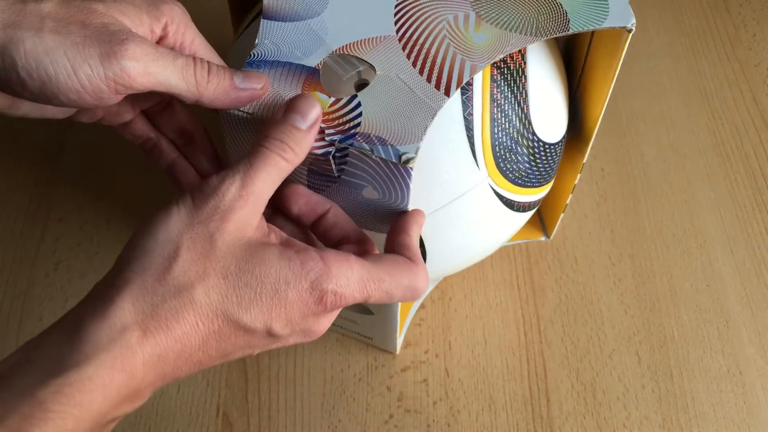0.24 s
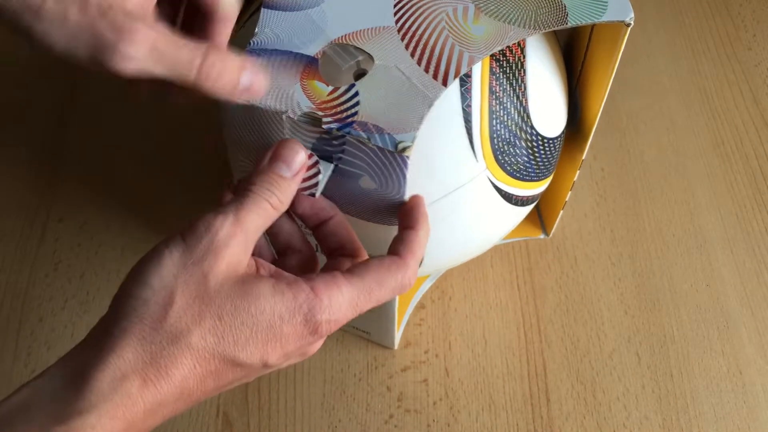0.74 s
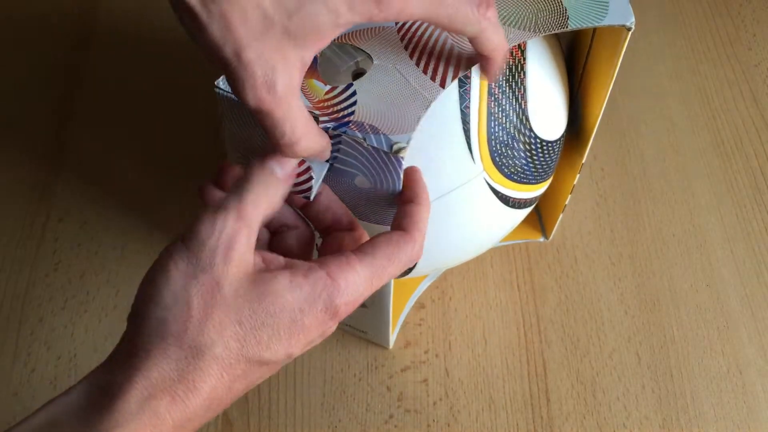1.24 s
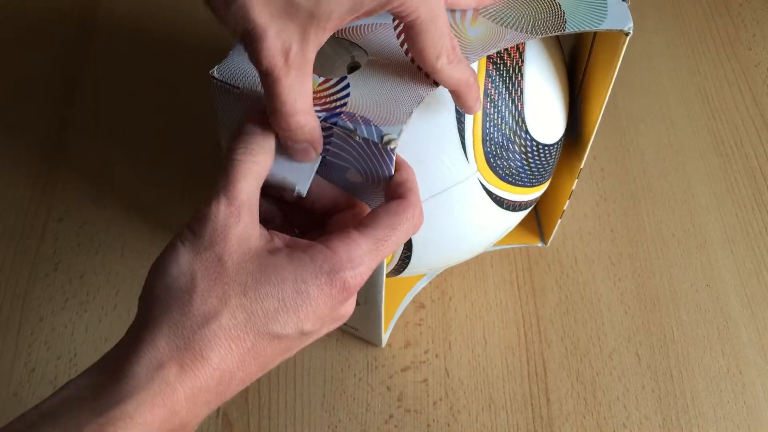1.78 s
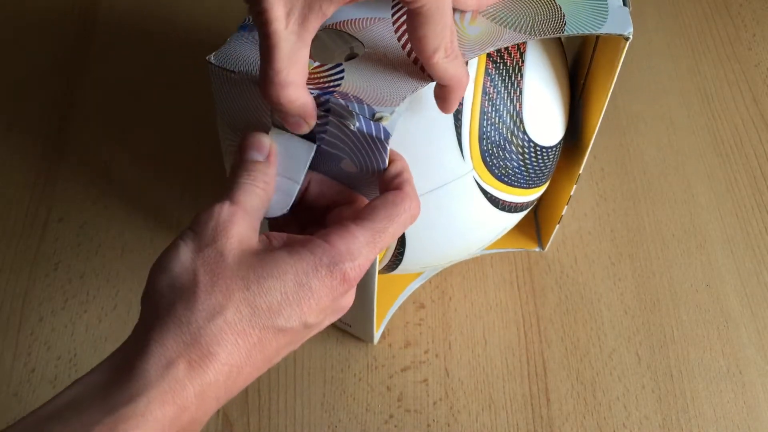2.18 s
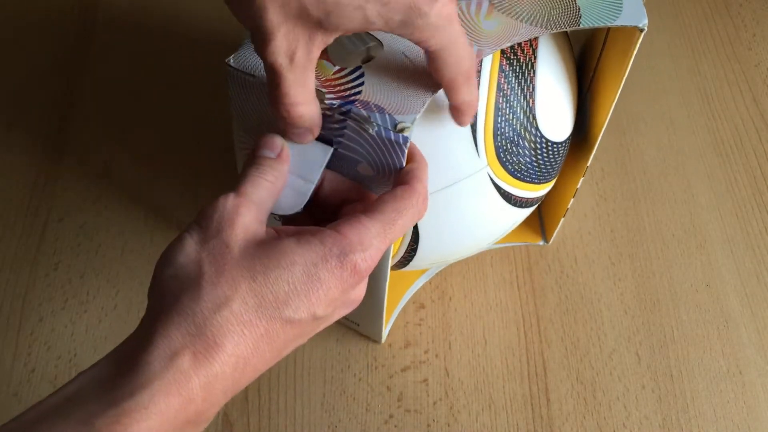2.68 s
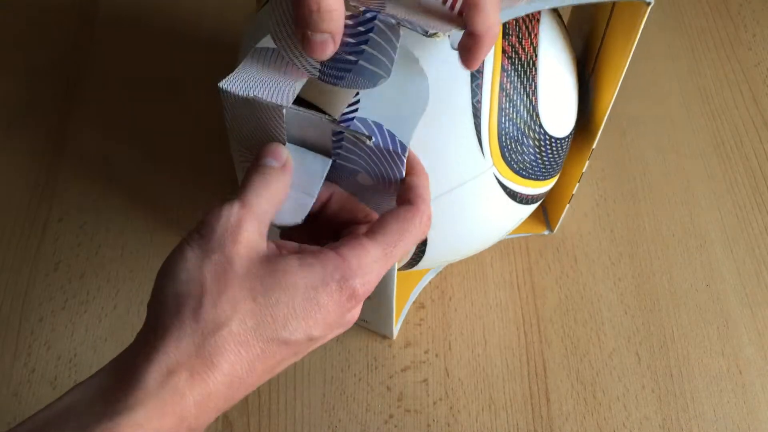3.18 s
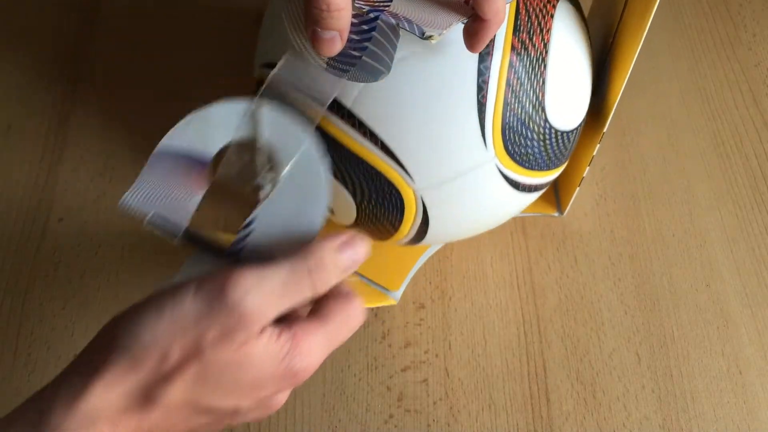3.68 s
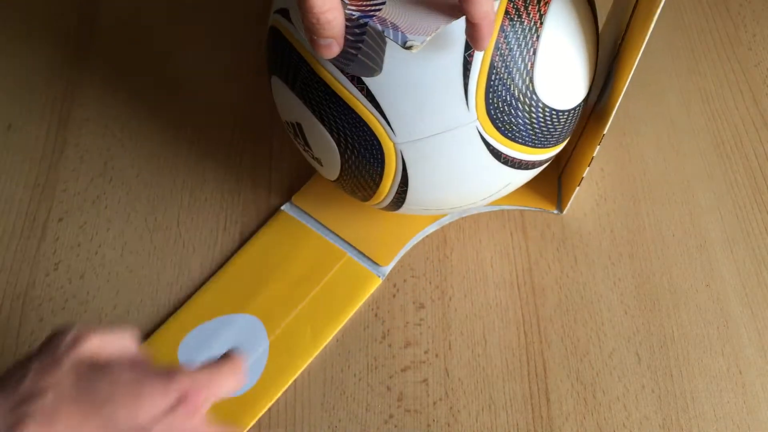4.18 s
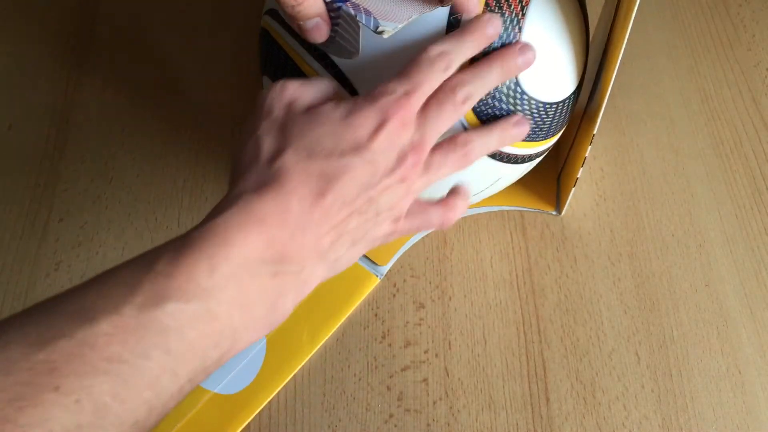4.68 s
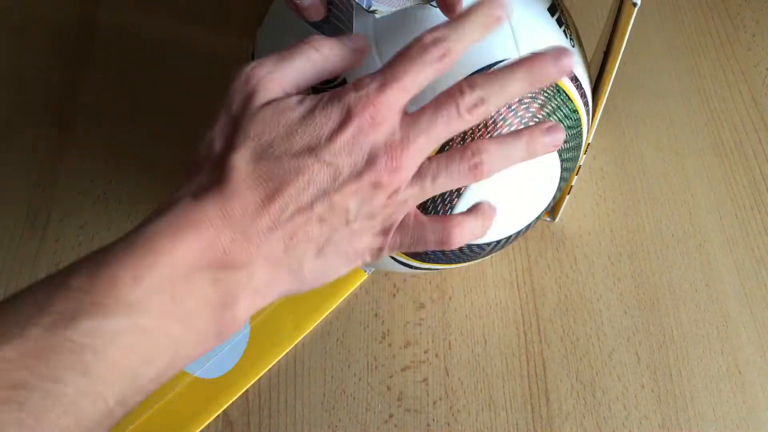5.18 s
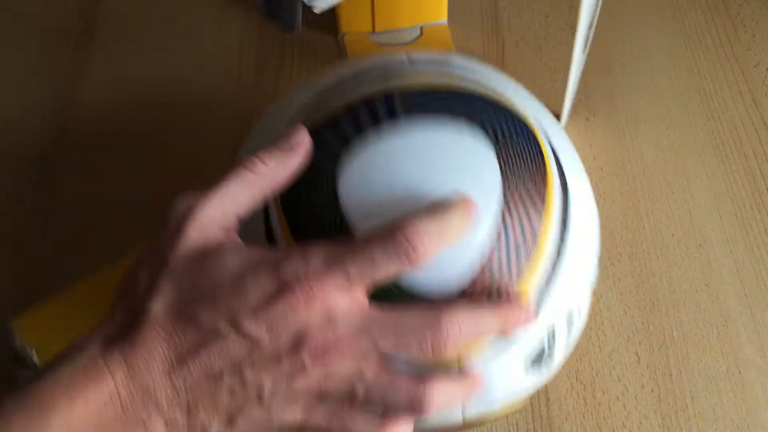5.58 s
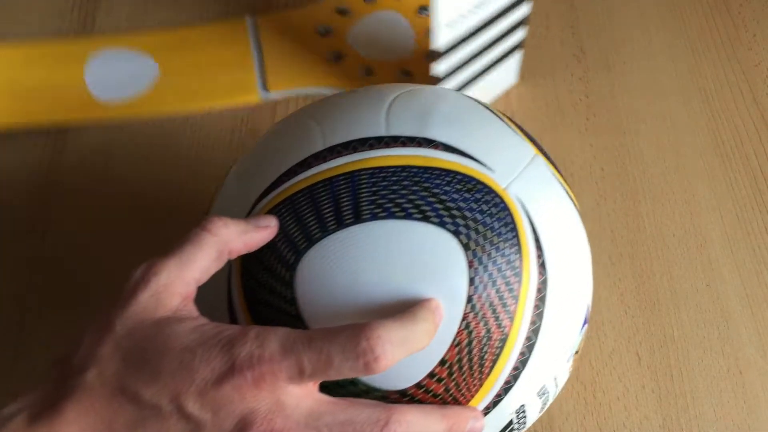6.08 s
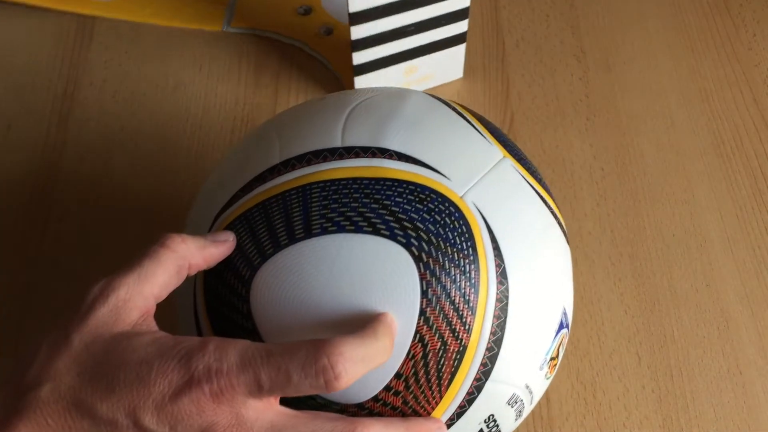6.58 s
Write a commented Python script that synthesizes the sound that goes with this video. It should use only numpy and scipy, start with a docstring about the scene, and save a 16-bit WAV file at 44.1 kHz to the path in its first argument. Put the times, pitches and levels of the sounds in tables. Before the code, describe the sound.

Crisp card snaps, a quick tearing peel and a clattering flap, then soft ball thumps and an empty box scraping over a wooden table.

```python
"""Creases snap and a tab drags out of its slot as hands open a football's cardboard box on a wooden table.
A paper band peels off, fingers rub, and the loose card drops and bounces in the small room.
The ball rolls out with soft thumps, then the empty box is pushed away over the wood.
Drags, rubs and snaps are fibre slips through panel resonances; drops and bumps are decaying modes.
Faint air, a low hum and a short tail from the near walls surround them at a small microphone."""
import sys
import numpy as np
from scipy import signal
from scipy.fft import rfft, irfft, next_fast_len
from scipy.io import wavfile
from scipy.ndimage import uniform_filter1d

SR = 44100
rng = np.random.default_rng(int(sys.argv[2]) if len(sys.argv) > 2 else 0)


def waveform_to_disk(signal):
    """Save audio, clipped to [-1, 1], as 16-bit WAV at the path in sys.argv[1]."""
    frames = np.transpose(np.atleast_2d(signal))
    scaled = np.clip(frames, -1, 1) * 32767
    samples = np.round(scaled).astype(np.int16)
    wavfile.write(sys.argv[1], SR, samples)


N = 301644
T = np.arange(N) / SR

# colour of rubbed card and of the rubbed box: hz, level_db
CARD_COLOUR = [(150, -2), (400, -14), (620, -4), (900, -2.5), (1800, 10), (2700, -4.5), (4000, -7.5),
               (8500, -7.5), (11500, -11.5), (15500, -14.5)]
BOX_COLOUR = [(150, 3), (400, -3), (700, -8.5), (1100, -3.5), (1500, -3), (2300, 2.5), (4200, -12.5),
              (6000, -10.5), (9500, -15), (11000, -20), (15500, -21)]
# resonances standing over the card's colour: centre_hz, width_hz, lift_db
CARD_RESONANCES = [(396, 160, 15.5), (1262, 200, 6), (1740, 390, -10.5), (3390, 310, 6.5), (4320, 180, 4.5),
                   (9000, 1200, 2.5)]


def undb(db):
    """Decibels to gain."""
    return 10 ** (np.asarray(db) / 20)


def unit(x):
    """Scale to rms 1."""
    return x / np.sqrt(np.mean(x ** 2) + 1e-30)


def add(out, s, x):
    """Mix x into out from time s."""
    i = int(np.clip(s * SR, 0, N - 1))
    out[i:i + len(x)] += x[:N - i]


def walk(size, rate):
    """Smooth random drift with spread near 1, turning at most rate times a second."""
    step = SR / rate
    knots = rng.standard_normal(size // 20 + 4)
    return np.interp(np.arange(size) / step, np.arange(len(knots)), knots) * np.sqrt(3 / 2)


def strokes(rows, attack_s, release_s):
    """Level in dB of held strokes that rise and fall by 20 dB per attack and release time."""
    levels = []
    for start, end, db in rows:
        outside = np.maximum((start - T) / attack_s, (T - end) / release_s)
        levels.append(db - 20 * np.maximum(0, outside))
    return np.max(levels, axis=0)


def follow(curve):
    """Level in dB along a curve, silent outside it."""
    return np.interp(T, *np.transpose(curve), left=-np.inf, right=-np.inf)


def response(colour, peaks=(), size=2048):
    """Causal impulse response of a surface: its broad colour with panel resonances on top."""
    f = np.arange(size // 2 + 1) * SR / size
    hz, db = np.transpose(colour)
    gain_db = np.interp(np.log(f + 1), np.log(hz), db)
    gain_db = gain_db - 20 * np.log10(1 + (hz[0] / (f + 1)) ** 2)  # bass roll-off
    for centre, width, lift in peaks:
        gain_db = gain_db + lift / (1 + (2 * (f - centre) / width) ** 2)
    # folding the cepstrum gives minimum phase: the energy comes as early as it can
    cepstrum = irfft(gain_db * np.log(10) / 20)
    cepstrum[1:size // 2] *= 2
    cepstrum[size // 2 + 1:] = 0
    return irfft(np.exp(rfft(cepstrum)))


def bass_of(db):
    """Bass in dB over the middle: it grows more slowly than the rest as a contact gets stronger."""
    return -13 - 0.19 * (db + 51)


def radiate(force, ring, db, treble_db, bass_db):
    """A force sounds a panel: sharp contact brings out treble, a firmly coupled box brings out bass."""
    size = next_fast_len(len(force) + len(ring))
    f = np.fft.rfftfreq(size, 1 / SR)
    sound = rfft(force, size) * rfft(ring, size)
    low = 1 / (1 + (f / 700) ** 8)
    high = 1 - 1 / (1 + (f / 3000) ** 12)
    out = 0
    for mask, lift_db in ((1 - low - high, 0), (high, treble_db), (low, bass_db)):
        band = irfft(sound * mask, size)[:len(force)]
        out = out + unit(band) * undb(db + lift_db)
    return out * np.std(force)


def fibres(size, rate, spread_db):
    """Paper fibres catch and let go: random slips per second, uneven in strength, over a soft hiss."""
    slips = rng.random(size) < rate / SR
    strength = undb(spread_db * np.minimum(rng.exponential(size=size), 4))
    direction = rng.choice([-1, 1], size)
    return unit(slips * strength * direction + 0.18 * rng.standard_normal(size))


def scrape(level_db, ring, rate, spread_db, grip_db, gain_db, treble_db, brighten, bass_db, patchy_db,
           size=512):
    """In a drag fibres stick and slip under uneven pressure; brighten is treble dB per dB of level."""
    moving = level_db > -90
    slips = fibres(N, rate, spread_db) * undb(grip_db * walk(N, rate=140))
    # the contact point travels, so it drives ever different narrow resonances of the panel
    bands = signal.stft(slips, nperseg=size)[2]
    patches = uniform_filter1d(rng.standard_normal(bands.shape), size=3, axis=0)
    patches = unit(uniform_filter1d(patches, size=8, axis=1))
    force = signal.istft(bands * undb(patchy_db * patches), nperseg=size)[1][:N][moving]
    db = level_db[moving]
    treble = treble_db + brighten * (db - db.max())
    out = np.zeros(N)
    out[moving] = radiate(unit(force), ring, db + gain_db, treble, bass_of(db) + bass_db)
    return out


def strike(modes, weights, detune, size=12000):
    """Decaying modes after one blow, peak 1; neighbouring modes swing opposite ways."""
    t = np.arange(size) / SR
    hz, db, t60 = np.transpose(modes)[:, :, None]
    hz = hz * (1 + detune * rng.standard_normal(hz.shape))
    swings = undb(db - 60 * t / t60) * np.sin(2 * np.pi * hz * t)
    signs = (-1) ** np.arange(len(modes))
    ring = (weights * signs) @ swings
    return ring / np.abs(ring).max()


def background(air_db=-70, hum_db=-74.5, hum_hz=120.8, waver_db=0.5):
    """The still room: faint steady air as coloured noise, and a low hum wavering in phase and level."""
    # colour of the air: hz, level_db (per Hz, relative)
    air_colour = [(25, -2), (60, 1), (130, 2.5), (300, -6.5), (600, -12), (2000, -14.5), (8000, -21.5),
                  (15000, -25)]
    noise = rng.standard_normal(N + 8191)
    air = signal.fftconvolve(noise, response(air_colour, size=8192), "valid")
    hum = np.sin(2 * np.pi * hum_hz * T + 0.4 * walk(N, rate=4.7))
    hum = hum * undb(waver_db * walk(N, rate=10))
    return undb(air_db) * unit(air) + undb(hum_db) * unit(hum)


def room(x, wet_db=-13, t60=0.18, dull_hz=6000, gap_s=0.005, size=16000):
    """The short, slightly dull tail that the near walls send back."""
    t = np.arange(size) / SR
    tail = fibres(size, rate=4000, spread_db=0.5)  # random slips serve as dense echoes
    tail = tail * undb(-60 * t / t60) * (t > gap_s)
    tail = signal.lfilter(*signal.butter(1, dull_hz, fs=SR), tail)
    return undb(wet_db) * signal.fftconvolve(x, tail / np.linalg.norm(tail))[:N]


def grip_shifts():
    """Hands shift their grip on the card: sparse, faint fibre slips."""
    # shifts: start_s, end_s, level_db (before gain)
    shifts = [(0.24, 0.34, -79.5), (2.1, 2.22, -72), (2.54, 2.76, -75.5), (3.3, 3.48, -74)]
    return scrape(strokes(shifts, attack_s=0.058, release_s=0.045), response(CARD_COLOUR, CARD_RESONANCES),
                  rate=260, spread_db=1.5, grip_db=4.5, gain_db=0.5,
                  treble_db=-2.5, brighten=-0.13, bass_db=3.5, patchy_db=5)


def palm():
    """Dry skin hisses over the smooth ball: dense slips through the skin's colour."""
    # brushes of the palm: start_s, end_s, level_db
    brushes = [(5.01, 5.075, -60.5), (5.39, 5.49, -57)]
    # colour of skin on the ball: hz, level_db
    skin_colour = [(200, 6.5), (1500, -14), (7000, -6), (15500, -0.5)]
    hiss = signal.fftconvolve(fibres(N, rate=10000, spread_db=4), response(skin_colour))[:N]
    return unit(hiss) * undb(strokes(brushes, attack_s=0.083, release_s=0.086))


def rubs(gain_db=-2.0, grip_db=3, bass_db=0.2, size=16000):
    """Short strokes of fingers and card on card swell and stop, with an uneven grip."""
    # strokes: start_s, end_s, level_db (before gain), treble_db (over the middle)
    rub_strokes = [(0.712, 0.789, -64, -1), (0.775, 0.795, -61.5, 8), (1.193, 1.235, -64, -4),
                   (1.233, 1.279, -56.5, 1), (1.319, 1.358, -66, -5), (1.683, 1.764, -66, -2),
                   (1.822, 1.86, -63.5, -1), (1.858, 1.95, -51.5, -0.5), (2.284, 2.308, -63.5, 3),
                   (2.437, 2.479, -64.5, -3.5), (2.628, 2.676, -64.5, 2.5), (3.497, 3.544, -59, 1),
                   (3.595, 3.714, -66.5, 9.5), (3.875, 3.998, -69.5, 2), (4.058, 4.12, -70, 2.5)]
    ring = response(CARD_COLOUR, CARD_RESONANCES)
    out = np.zeros(N)
    for start, end, db, treble_db in rub_strokes:
        count = int(np.clip((end - start) * SR, SR / 200, size - len(ring)))
        slips = fibres(size, rate=2700, spread_db=3.0) * undb(grip_db * walk(size, rate=149))
        force = unit(slips[:count] * signal.windows.tukey(count, 0.6))
        force = np.pad(force, (0, len(ring)))  # space for the panel to ring on
        add(out, start, radiate(force, ring, db + gain_db, treble_db, bass_of(db) + bass_db))
    return out


def ball_rubs():
    """The ball rubs in its seat, then rolls out: fibre slips sound the box."""
    # rubs: start_s, end_s, level_db (before gain)
    seat_rubs = [(4.62, 5.1, -76.5), (4.9, 4.915, -52.5), (5.5, 5.62, -50.5), (5.64, 5.81, -49)]
    # resonances over the box's colour: centre_hz, width_hz, lift_db
    box_resonances = [(405, 38, 9.3), (1010, 71, 4.1), (2056, 340, 13.7), (2630, 50, 1.3), (3450, 110, 3.5),
                      (8600, 1000, 1.8)]
    return scrape(strokes(seat_rubs, attack_s=0.085, release_s=0.058), response(BOX_COLOUR, box_resonances),
                  rate=4000, spread_db=3, grip_db=2.0, gain_db=-1.5,
                  treble_db=-5.5, brighten=-0.11, bass_db=-5.5, patchy_db=2.5)


def bumps(octaves=0.49):
    """Ball and hands bump the box: soft contacts wake its low modes, hard ones the high."""
    # contacts: s, peak_db, driven_hz (where the contact drives most)
    contacts = [(1.107, -32.5, 3320), (1.420, -28, 1010), (2.314, -51, 453), (2.333, -57.5, 437),
                (2.636, -51.5, 228), (3.061, -41.5, 270), (3.112, -45, 705), (3.627, -45, 438),
                (4.188, -41.5, 297), (5.292, -40, 1440), (5.295, -53.5, 410), (5.4698, -39.5, 860),
                (5.472, -43.5, 275), (5.506, -48.5, 262), (5.572, -44, 87), (5.6, -52, 74), (5.68, -58, 70),
                (6.43, -56.5, 89)]
    # modes of the box with the ball in it: hz, level_db, t60_s
    box_modes = [(60.5, -11, 0.45), (95, -6, 0.12), (148, 3, 0.076), (227, -6, 0.073), (337, -5.5, 0.091),
                 (394.4, -4.5, .1), (446, 2, 0.054), (638, -4.5, 0.06), (783, -3.5, 0.047),
                 (1000, -9, 0.039), (1278, 2, 0.026), (1505, 0, 0.028), (3240, -16, 0.018)]
    out = np.zeros(N)
    mode_hz = np.array(box_modes)[:, 0]
    for s, db, hz in contacts:
        weights = np.exp(-(np.log2(mode_hz / hz) / octaves) ** 2 / 2)
        add(out, s, undb(db) * strike(box_modes, weights, detune=0.029))
    return out


def slide():
    """The box is shoved across the table: its floor drags on the wood, brighter when louder."""
    # level along the shove: s, level_db (before gain)
    shove = [(5.64, -82), (5.718, -47.5), (5.766, -56.5), (5.782, -49.5), (5.854, -53.5), (6.016, -39),
             (6.056, -43.5), (6.196, -48.5), (6.216, -46), (6.45, -75)]
    # resonances of the box's floor on the table: centre_hz, width_hz, lift_db
    floor_resonances = [(398, 60, 9.5), (1086, 170, 10), (2050, 340, 10), (2420, 290, -1), (3300, 590, 5.5),
                        (5440, 360, 4.5), (8850, 1700, 5.5)]
    return scrape(follow(shove), response(BOX_COLOUR, floor_resonances),
                  rate=7700, spread_db=1.5, grip_db=1.75, gain_db=-4.0,
                  treble_db=4.5, brighten=0.18, bass_db=-5, patchy_db=3)


def empty_pushes():
    """The empty box is pushed twice more: dense slips that swell in and fade slowly."""
    # pushes: start_s, end_s, level_db (before gain)
    push_strokes = [(6.54, 6.57, -60), (6.73, 6.84, -54.5)]
    # resonances of the empty box: centre_hz, width_hz, lift_db
    empty_resonances = [(2030, 88, 9.1), (3210, 170, 13.4)]
    return scrape(strokes(push_strokes, attack_s=0.11, release_s=0.29), response(BOX_COLOUR, empty_resonances),
                  rate=9900, spread_db=1.0, grip_db=2.2, gain_db=-1.9,
                  treble_db=3.5, brighten=0.36, bass_db=-3.5, patchy_db=1)


def dropped_card(slap_db=1, slap_s=0.0019, low_hz=1100, high_hz=3500, tick_db=-24, tick_s=0.00046):
    """The card lands on one edge after another; every touch ticks, slaps the wood and rings the card."""
    # touches: s, level_db (before the 4 dB cut below)
    touches = [(4.1802, -21.5), (4.1836, -19), (4.1884, -25), (4.212, -48), (4.233, -41), (4.2539, -36),
               (4.262, -34), (4.2725, -34), (4.296, -51), (4.336, -47.5)]
    # modes of the loose card: hz, level_db, t60_s
    card_modes = [(402, -11.5, 0.14), (914, -4, 0.085), (1004, -8, 0.088), (714, -12.5, 0.087),
                  (1340, 7, 0.025), (1530, -4.5, 0.064), (1860, 9.5, 0.025), (2172, 11, 0.037),
                  (2570, -1, 0.018), (3100, 5, 0.024), (3260, -15, 0.023)]
    slap_band = signal.butter(2, [low_hz, high_hz], "band", fs=SR)
    out = np.zeros(N)
    for s, db in touches:
        weights = undb(2 * rng.standard_normal(len(card_modes)))
        ring = strike(card_modes, weights, detune=0.026)
        t = T[:len(ring)]
        grit = rng.standard_normal(len(ring))
        slap = signal.lfilter(*slap_band, grit * np.exp(-t / slap_s))
        tick = grit * np.exp(-t / tick_s)
        add(out, s, undb(db - 4) * (ring + undb(slap_db) * slap + undb(tick_db) * tick))
    return out


def unhook():
    """A tab is dragged out of its slot, faster until it comes free: dense slips grow louder and brighter."""
    # level along the pull: s, level_db (before gain)
    pull = [(0.355, -72), (0.402, -50), (0.42, -58), (0.475, -47.5), (0.508, -46), (0.526, -35),
            (0.545, -26), (0.559, -36), (0.567, -49)]
    # resonances of the tab in its slot: centre_hz, width_hz, lift_db
    tab_resonances = [(400, 71, 10), (630, 170, -14.5), (910, 340, 6), (1530, 260, 0.5), (3550, 280, 10.5),
                      (4580, 200, 7), (5500, 350, 3), (9100, 1700, 5)]
    return scrape(follow(pull), response(CARD_COLOUR, tab_resonances),
                  rate=6000, spread_db=2.5, grip_db=1.2, gain_db=-2.5,
                  treble_db=1.5, brighten=0.27, bass_db=-4.5, patchy_db=1.5)


def peel(start_s=2.851, end_s=3.112, slack_db=6.5, tighten_s=0.027):
    """The paper band peels away in one pull that catches at once, tightens from slack and lets go."""
    # colour of the band: hz, level_db
    band_colour = [(150, -17.5), (400, -3), (780, -15), (1150, 6.5), (1800, 5.5), (2800, -9), (4300, -11.5),
                   (9000, 0), (12000, -6), (15500, -6)]
    # resonances of the band: centre_hz, width_hz, lift_db
    band_resonances = [(437, 95, 10), (1460, 190, 8.9), (2160, 450, 7.7), (3393, 590, 23.5),
                       (4320, 590, 15.5), (5730, 450, 12.3)]
    slack = slack_db * np.exp(-np.maximum(T - start_s, 0) / tighten_s)
    pull = strokes([(start_s, end_s, -45.5)], attack_s=0.0071, release_s=0.018) - slack
    return scrape(pull, response(band_colour, band_resonances),
                  rate=2000, spread_db=1.0, grip_db=1.0, gain_db=0.47,
                  treble_db=3.5, brighten=0.074, bass_db=0.0, patchy_db=4.5)


def snaps(gain_db=-2.0, fade=0.68, rise_s=0.00056, size=3000):
    """Each crease or card edge gives way in a burst of fibre slips a few milliseconds long."""
    # snaps: s, length_s, level_db (before gain), treble_db (over the middle)
    creases = [(0.212, 0.0017, -37, -6), (0.4563, 0.0012, -39.5, 15.5), (0.552, 0.0048, -38, 12.5),
               (0.638, 0.0021, -42, -3), (0.762, 0.0038, -48, -22), (0.769, 0.0033, -52, -18),
               (0.86, 0.0041, -53, -5.5), (1.087, 0.0018, -53, -9), (1.0997, 0.001, -49, 4),
               (1.103, 0.0042, -48, 1.5), (1.230, 0.0037, -53, 6.5), (1.383, 0.0035, -54, 1),
               (1.394, 0.0034, -50.5, -5), (1.416, 0.0043, -38, 1.5), (1.4188, 0.0018, -31, 5),
               (1.689, 0.013, -55.5, -9.5), (1.889, 0.0019, -41, 2), (1.908, 0.0058, -42.5, -4),
               (2.482, 0.006, -55, 8.5), (2.498, .0042, -50.5, -10), (2.637, 0.0011, -41, -7),
               (2.853, 0.0062, -51, 19), (2.856, 0.0027, -48.5, 18), (2.953, 0.0053, -45, 4),
               (3.013, .003, -45, -4), (3.036, 0.0022, -49, 8), (3.049, 0.003, -42, 6.5),
               (3.095, 0.0029, -44, 0), (3.1, 0.0044, -43.5, 6), (3.119, 0.0031, -35, 6),
               (3.237, 0.0037, -48.5, -5.5), (3.3186, 0.0032, -62, 15), (3.498, 0.0065, -66, 15),
               (3.626, 0.0081, -46, -0.5), (3.677, 0.0058, -50, 7.5), (3.718, 0.0096, -50.5, 5),
               (3.823, 0.0022, -41.5, 2), (4.21, 0.0018, -38, -10), (5.29, 0.0036, -66, 10.5),
               (5.4695, 0.0019, -39.5, -7.5)]
    ring = response(CARD_COLOUR, CARD_RESONANCES)
    out = np.zeros(N)
    t = np.arange(size) / SR
    for s, length, db, treble_db in creases:
        length = max(length, 1 / 2000)
        envelope = np.exp(-fade * (t / length) ** 2) * (1 - np.exp(-t / rise_s))
        force = unit(fibres(size, rate=5000, spread_db=-1.0) * envelope)
        force = force * np.sqrt(length * SR / size)  # the level holds over the burst's own length
        add(out, s, radiate(force, ring, db + gain_db, treble_db, bass_of(db)))
    return out


def scene():
    """All the handling on the table, heard in the room."""
    drags = grip_shifts() + unhook() + peel() + ball_rubs() + slide() + empty_pushes()
    handling = rubs() + drags + palm() + dropped_card() + bumps()
    # a snapping crease radiates differently in each direction, so the walls blend several sides of it
    sides = [room(snaps()) for _ in range(3)]
    snap_tail = sum(sides) / np.sqrt(len(sides))
    return (handling + snaps() + room(handling) + snap_tail + background())[None]


def record(dry):
    """The small microphone loses the deepest bass; the recorder cuts the top."""
    thin = signal.sosfilt(signal.butter(2, 42, "high", fs=SR, output="sos"), dry)
    return signal.sosfilt(signal.ellip(10, 0.2, 70, 15600, fs=SR, output="sos"), thin)


dry = scene()
out = record(dry)
waveform_to_disk(out)
```